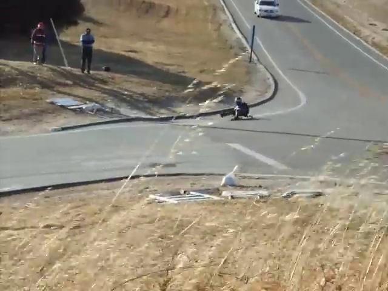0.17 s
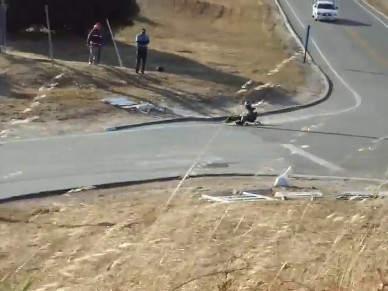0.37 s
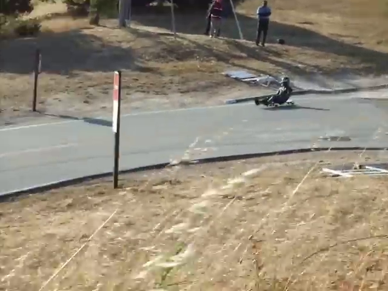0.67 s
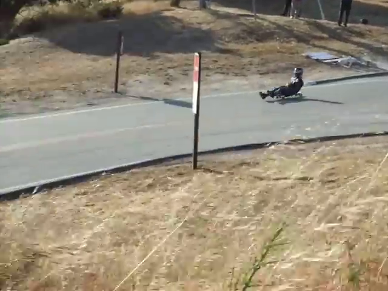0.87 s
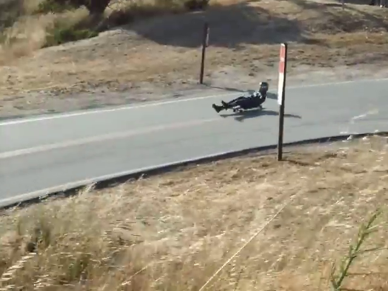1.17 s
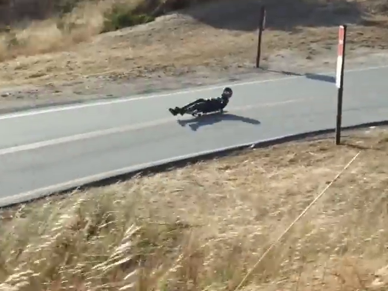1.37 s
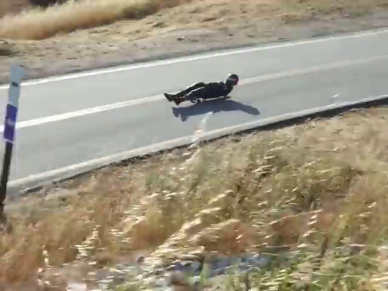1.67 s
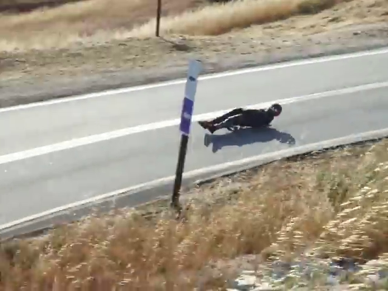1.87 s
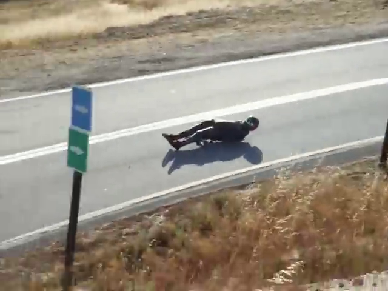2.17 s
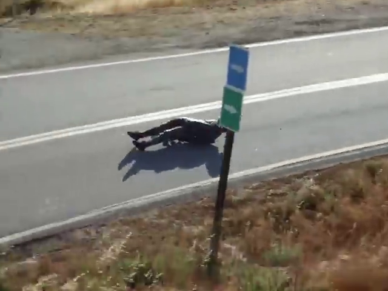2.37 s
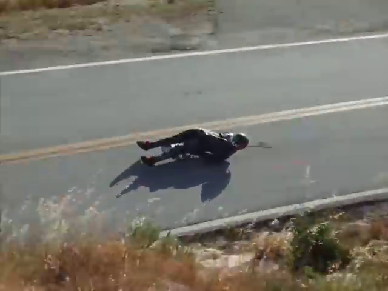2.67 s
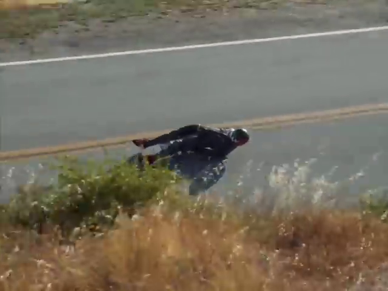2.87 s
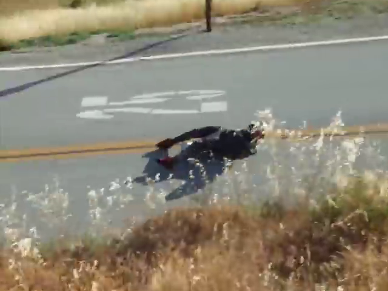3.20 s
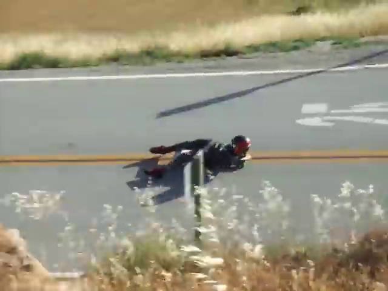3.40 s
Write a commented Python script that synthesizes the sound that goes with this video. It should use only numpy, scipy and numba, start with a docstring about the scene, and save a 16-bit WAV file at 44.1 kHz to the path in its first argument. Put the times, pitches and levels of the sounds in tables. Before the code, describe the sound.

Gusty wind rumbles, flutters and thumps on an unshielded microphone beside a paved road.

```python
"""Gusty wind on a small microphone

Gusty wind hits an unshielded microphone beside a road. Big eddies rumble as lumpy low noise; small eddies
tear past as a band of noise that brightens as the air speeds up; single puffs thump as bumps of pressure.
A board's wheels hiss faintly on the asphalt, with a high hiss, a few dry ticks and steady far road noise.
The microphone thins the deepest bass, flattens the loudest peaks and cuts the top."""
import sys
import numpy as np
from scipy import signal
from scipy.io import wavfile
from scipy.ndimage import uniform_filter1d
from numba import njit

SR = 44100
rng = np.random.default_rng(int(sys.argv[2]) if len(sys.argv) > 2 else 0)


def log_audio(samples):
    """Write samples as a 16-bit WAV file to the path given in sys.argv[1]."""
    # one column per channel
    frames = np.atleast_2d(samples).T
    # limit to full scale, then quantise
    limited = np.clip(frames, -1, 1)
    pcm = np.round(limited * 32767).astype(np.int16)
    wavfile.write(sys.argv[1], SR, pcm)


N = 156114   # length in samples


def amp(db):
    """Turn decibels into a gain."""
    return 10 ** (np.asarray(db) / 20)


def rms_one(x):
    """Scale a sound to an rms (average strength) of 1."""
    return x / np.sqrt(np.mean(x ** 2))


def in_time(rows):
    """Draw straight lines between the rows of a table: one curve per column after the time."""
    times, *columns = np.transpose(rows)
    t = np.arange(N) / SR
    return [np.interp(t, times, column) for column in columns]


def drift(hz):
    """Random wandering with an rms of 1: noise smoothed by two equal low-passes at hz."""
    r = np.exp(-2 * np.pi * hz / SR)
    noise = rng.standard_normal(N + SR)
    wander = signal.lfilter([1], [1, -2 * r, r * r], noise)
    return rms_one(wander[SR:])   # the first second lets the filter settle


def band(low_hz, high_hz, order=2):
    """Noise between two frequencies, with an rms of 1."""
    sos = signal.butter(order, [low_hz, high_hz], "band", fs=SR, output="sos")
    noise = signal.sosfilt(sos, rng.standard_normal(N + SR))
    return rms_one(noise[SR:])


EVENNESS = 0.7   # 0 leaves the noise's own swelling alone, 1 takes most of it out


def evened(x, window_ms):
    """Even out the noise, as a fast level control would: divide out part of its swelling; rms 1."""
    window = max(int(window_ms * SR / 1000), 1)
    power = uniform_filter1d(rms_one(x) ** 2, window)
    return rms_one(x / (np.abs(power) + 0.06) ** (EVENNESS / 2))


@njit
def moving_lowpass(x, k, count):
    """A chain of count one-pole low-passes whose shared coefficient k moves with time."""
    out, state = x.copy(), np.zeros(count)
    for i in range(len(x)):
        for j in range(count):
            state[j] += k[i] * (out[i] - state[j])
            out[i] = state[j]
    return out


def pole(hz):
    """Low-pass coefficient for a corner frequency."""
    return 1 - np.exp(-2 * np.pi * hz / SR)


ROAD_LOW_HZ, ROAD_HIGH_HZ, ROAD_DB = 504, 1820, -59.5


def road_noise():
    """Far road noise: a steady band of noise in the middle range."""
    return amp(ROAD_DB) * band(ROAD_LOW_HZ, ROAD_HIGH_HZ)


WHEEL_LOW_HZ, WHEEL_HIGH_HZ, WHEEL_TRIM_DB, WHEEL_GRAIN_DB = 2130, 4300, -1.13, -0.5
HIGH_LOW_HZ, HIGH_TOP_HZ, HIGH_TRIM_DB, HIGH_GRAIN_DB = 4300, 8700, 2.5, 0.5
# How loud the two hisses are over time, before their trims and grain.
# Columns: t/s, wheel noise level/dB, high hiss level/dB
HISS_LEVELS = [(0, -61, -61), (.03, -43.5, -64), (.07, -54, -60), (.13, -52.5, -58), (.2, -51.5, -62),
               (.37, -57.5, -60), (.5, -62, -60.5), (1.2, -62, -60), (2.55, -60.5, -60.5),
               (3.0, -62, -60.5), (3.11, -56.5, -56.5), (3.2, -59.5, -60), (3.33, -58, -60),
               (3.39, -54, -55.5), (3.44, -57, -58), (3.5, -51, -55.5), (3.54, -52, -52)]


def hiss():
    """Wheels on asphalt and a high hiss: two bands of noise with slightly unsteady levels."""
    wheel_db, high_db = in_time(HISS_LEVELS)
    wheels = band(WHEEL_LOW_HZ, WHEEL_HIGH_HZ)
    wheels = wheels * amp(wheel_db + WHEEL_TRIM_DB + WHEEL_GRAIN_DB * drift(25))
    high = band(HIGH_LOW_HZ, HIGH_TOP_HZ, order=3)
    high = high * amp(high_db + HIGH_TRIM_DB + HIGH_GRAIN_DB * drift(30))
    return wheels + high


TICK_DECAY_MS, TICK_LOW_HZ, TICK_HIGH_HZ = 0.6, 1500, 5000
# The dry ticks, each with its starting strength before the band filter.
# Columns: t/s, level/dB
TICK_TIMES = [(.2645, -30), (.4381, -29), (.645, -29), (1.684, -29), (2.361, -30), (2.4695, -27),
              (2.485, -28), (2.516, -27), (2.6355, -27), (2.784, -33)]


def ticks():
    """Dry ticks: each is one snap of noise that dies at once, kept to a bright band."""
    out = np.full(N, 1e-18)
    t = np.arange(SR // 200) / SR
    fade = np.exp(-1000 * t / TICK_DECAY_MS)
    for start_s, level_db in TICK_TIMES:
        snap = rng.standard_normal(len(t)) * fade
        out[int(start_s * SR):][:len(t)] = amp(level_db) * snap
    sos = signal.butter(2, [TICK_LOW_HZ, TICK_HIGH_HZ], "band", fs=SR, output="sos")
    return signal.sosfilt(sos, out)


RUMBLE_LOW_HZ, RUMBLE_HIGH_HZ, RUMBLE_EVEN_MS = 21.6, 100.3, 29
RUMBLE_TRIM_DB, RUMBLE_LUMPS_DB, RUMBLE_LUMPS_HZ = 1.17, -1, 9.6


def rumble(level_db):
    """Big eddies press slowly on the microphone: lumpy low noise."""
    noise = evened(band(RUMBLE_LOW_HZ, RUMBLE_HIGH_HZ), RUMBLE_EVEN_MS)
    lumps_db = RUMBLE_LUMPS_DB * drift(RUMBLE_LUMPS_HZ)
    return noise * amp(level_db + RUMBLE_TRIM_DB + lumps_db)


# The corner (upper edge) of the eddy band is CORNER_HZ at this treble share and rises with it.
CORNER_HZ, CORNER_AT_DB, DB_PER_OCTAVE = 448, -16, 12.5
FASTEST_CORNER_HZ = 915    # the steady air speed tops out here, before the quick changes
EDDY_LOW_SHARE = 0.35      # low edge of the band, as a share of the corner
SPEED_FLUTTER_OCT, SPEED_FLUTTER_HZ = 0.068, 60   # quick chance changes in air speed
CRACKLE_OCT, CRACKLE_HZ = 0.6, 196   # still quicker: thin bright streaks, before calming
CRACKLE_CALMS = 0.59       # share of the streaks lost at full air speed
FINE_EDDY_GAIN_DB, FINE_CORNER_RATIO = -30.5, 2.46   # a weak skirt of finer eddies above the corner
EDDY_EVEN_MS, EDDY_LUMPS_DB, EDDY_LUMPS_HZ = 16, 1.53, 50.3


def eddy_corner(treble_db):
    """Faster air makes brighter eddies: the corner follows the treble, with quick random changes."""
    steady = CORNER_HZ * 2 ** ((treble_db - CORNER_AT_DB) / DB_PER_OCTAVE)
    steady = np.minimum(steady, FASTEST_CORNER_HZ)
    streaks_oct = CRACKLE_OCT * (1 - CRACKLE_CALMS * steady / FASTEST_CORNER_HZ)
    flutter = SPEED_FLUTTER_OCT * drift(SPEED_FLUTTER_HZ)
    crackle = streaks_oct * drift(CRACKLE_HZ)
    return np.clip(steady * 2 ** (flutter + crackle), 60, 3000)


def small_eddies(level_db, treble_db):
    """Small eddies tear past: noise in a band that slides with the air speed, set in level by the gust."""
    corner = eddy_corner(treble_db)
    main = moving_lowpass(rng.standard_normal(N), pole(corner), count=5)
    fine = moving_lowpass(rng.standard_normal(N), pole(FINE_CORNER_RATIO * corner), count=4)
    x = main + amp(FINE_EDDY_GAIN_DB) * fine
    x = x - moving_lowpass(x, pole(EDDY_LOW_SHARE * corner), count=1)   # take away the lows
    x = evened(x / np.sqrt(corner), EDDY_EVEN_MS)   # a wider band must not be louder
    return x * amp(level_db + EDDY_LUMPS_DB * drift(EDDY_LUMPS_HZ))


PUFF_RISE_SHARE = 0.44   # rise time as a share of the fall time
PUFF_SHARPNESS = 1.9     # 2 is a round bump, 1 a pointed one
PUFF_DIP, PUFF_DIP_MS = 0.55, 7.2   # depth and half-width of the dip in the turbulence
# The single puffs: a peak above 0 pushes the diaphragm, below 0 sucks it.
# Columns: t/s, peak pressure (1 = full scale, before the microphone), fall/ms
PUFF_BUMPS = [(0.2344, -0.56, 1.1), (.236, 0.24, 2.4), (0.2642, -.8, 1.6), (0.2653, 0.54, 1.16),
              (.276, 0.64, 2.2), (0.435, 0.33, 3.2), (0.448, -0.64, 3.5), (.494, 0.64, 1.04),
              (.646, -0.71, 0.94), (.667, 0.61, 1), (.719, 0.68, 1.8), (0.775, -0.46, 3.7),
              (0.8983, -0.18, 0.72), (0.9663, -0.21, 1.1), (1.682, -0.41, 0.83), (1.686, 0.73, 2.9),
              (1.691, -.3, 2.5), (1.8751, -0.53, 0.71), (1.878, 0.54, 3.3), (2.504, 0.35, 5),
              (2.691, -0.33, 5.6), (2.753, 0.49, 0.78), (2.766, -0.66, 0.39), (2.784, 0.97, 1.16),
              (2.875, 0.14, 0.46), (2.935, 0.63, 1.53), (2.952, 0.61, 0.56), (2.979, 0.52, 1.9),
              (3.013, 0.69, 1.77), (3.178, -0.39, 0.72), (3.188, 0.49, 0.81)]


def puffs():
    """Each puff thumps the diaphragm: one short bump of pressure, steeper in front."""
    t = np.arange(N) / SR
    pressure = np.zeros(N)
    for peak_s, peak, fall_ms in PUFF_BUMPS:
        width_s = fall_ms / 1000 * np.where(t < peak_s, PUFF_RISE_SHARE, 1)
        pressure += peak * np.exp(-np.abs((t - peak_s) / width_s) ** PUFF_SHARPNESS)
    return pressure


def dip_around_puffs():
    """A gain that turns the turbulence down around each puff, so that the thump stands clear."""
    t = np.arange(N) / SR
    near = np.zeros(N)
    for peak_s, _, _ in PUFF_BUMPS:
        near = np.maximum(near, np.exp(-((t - peak_s) / (PUFF_DIP_MS / 1000)) ** 2))
    return 1 - PUFF_DIP * near


# The wind at the microphone, in three stretches, before trim, lumps and dips.
# The treble share of the small eddies only moves their corner.
# Columns: t/s, small eddies level/dB, rumble level/dB, treble share/dB
WIND_GUSTS = [
    [(0.0, -29, -30.5, -18), (0.036, -22, -24, -8), (0.062, -18, -23, -20.5), (0.086, -24.5, -29, -6),
     (0.136, -21.5, -24.5, -25), (0.17, -21, -27, -11.5), (0.196, -27.5, -33, -16.5),
     (0.25, -16.5, -19, -18), (0.29, -17.5, -15, -10.5), (0.38, -20.5, -23.5, -9), (0.415, -24, -27, -10.5),
     (0.446, -9, -18, -2), (0.46, -22.5, -22, -9), (0.484, -21.5, -26, -9.5), (0.545, -19.5, -19.5, -6.5),
     (0.57, -20.5, -37.5, -8), (0.59, -30, -14, -17.5), (0.66, -13.5, -39, -10), (0.69, -28.5, -23, -27.5),
     (0.722, -26.5, -17.5, 4), (0.748, -34, -25.5, -41.5), (0.768, -21, -20.5, -17.5),
     (0.844, -22.5, -17.5, -17.5), (0.89, -20, -27, -11), (0.96, -27.5, -15.5, -12),
     (1.006, -23.5, -26, -26.5), (1.032, -33, -22.5, -10), (1.098, -24.5, -18, -20),
     (1.152, -24.5, -20.5, -9.5), (1.178, -24, -42, -31.5), ],
    [(1.21, -29.5, -17.5, -24), (1.224, -16.5, -19, -21.5), (1.432, -25, -22, -9.5),
     (1.492, -24, -24.5, -25.5), (1.604, -20, -16.5, -12), (1.67, -25.5, -19, -11.5),
     (1.702, -30, -19, -2.5), (1.74, -26, -31, -17), (1.762, -21.5, -27, -22.5), (1.888, -23.5, -16.5, -20),
     (1.91, -17.5, -49, -18.5), (1.934, -18.5, -27, -4.5), (1.982, -16.5, -24, -7.5),
     (2.026, -19.5, -38, -3.5), (2.052, -15.5, -29, -12), (2.12, -16.5, -31, -5.5),
     (2.19, -17.5, -36, -6.5), (2.22, -19.5, -20, -3), (2.246, -18, -44, -3.5), (2.302, -16, -42, -10.5),
     (2.33, -17, -33, -8), (2.38, -18, -23.5, -8), (2.422, -21.5, -25.5, 1.5), (2.44, -16.5, -53.5, -3.5),
     (2.512, -23.5, -13.5, -5), (2.542, -22.5, -37, 4.5), ],
    [(2.56, -26, -29, -16), (2.572, -19, -19, -27), (2.588, -24, -17, -2), (2.61, -30, -25, -18),
     (2.63, -17, -15, -20), (2.66, -25.5, -43, -17.5), (2.67, -24, -28, -3.5), (2.692, -19, -20, -5),
     (2.712, -27, -13.5, -36), (2.757, -15, -17.5, -10), (2.767, -11.5, -17, 6),
     (2.774, -19.5, -18.5, -26.5), (2.832, -33, -23, -7.5), (2.882, -50, -14, -22.5),
     (2.906, -38, -19, -11), (2.924, -21.5, -41, -28), (2.95, -13, -14, 8), (2.996, -43.5, -26, -28.5),
     (3.014, -18, -9.5, -29.5), (3.042, -46, -31.5, -11), (3.072, -18, -17.5, -27.5),
     (3.14, -30, -24.5, -14.5), (3.156, -19.5, -19, -23.5), (3.176, -13, -10, -2.5), (3.2, -16, -31, -26),
     (3.222, -65, -26, -12.5), (3.276, -70, -25.5, -22), (3.316, -32.5, -22.5, -34.5),
     (3.342, -52, -33.5, -15), (3.416, -45.5, -31, -20.5), (3.478, -41, -17.5, -26.5),
     (3.514, -61, -35.5, -6.5), (3.54, -23, -24, -39.5)],
]


def wind():
    """Gusty wind: small eddies and rumble, turned down around each puff, plus the puffs themselves."""
    eddy_db, rumble_db, treble_db = in_time(np.concatenate(WIND_GUSTS))
    turbulence = small_eddies(eddy_db, treble_db) + rumble(rumble_db)
    return dip_around_puffs() * turbulence + puffs()


def scene():
    """Wind over faint road noise, hiss and ticks, in one channel."""
    road = road_noise()
    return (wind() + hiss() + ticks() + road)[None]


MIC_LOW_HZ, CLIP_LEVEL = 2.2, 0.72   # CLIP_LEVEL: 1 = full scale
TOP_ROLL_HZ, CUTOFF_HZ = 7650, 8960


def record(dry):
    """The microphone: the deepest bass rolls off, the loudest peaks flatten, the top is cut."""
    low_cut = signal.butter(1, MIC_LOW_HZ, "high", fs=SR, output="sos")
    top_roll = signal.butter(10, TOP_ROLL_HZ, fs=SR, output="sos")
    top_cut = signal.cheby2(16, 36, CUTOFF_HZ, fs=SR, output="sos")   # 36 dB down from the cutoff up
    x = signal.sosfilt(low_cut, dry)
    x = x / (1 + np.abs(x / CLIP_LEVEL) ** 8) ** (1 / 8)
    x = signal.sosfilt(top_roll, x)
    return signal.sosfilt(top_cut, x)


dry = scene()
out = record(dry)
log_audio(out)
```